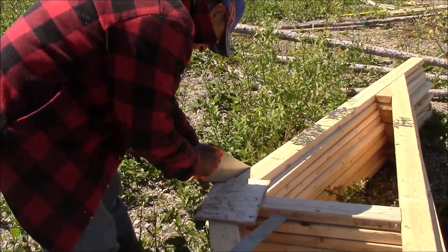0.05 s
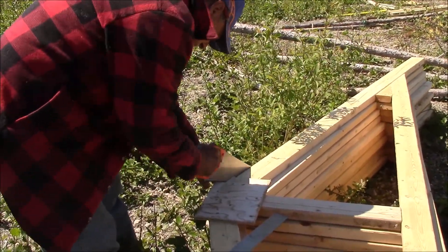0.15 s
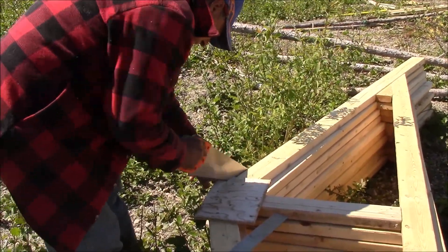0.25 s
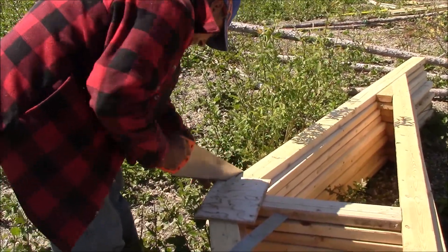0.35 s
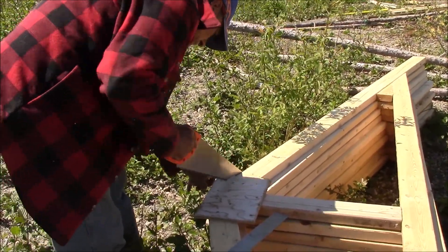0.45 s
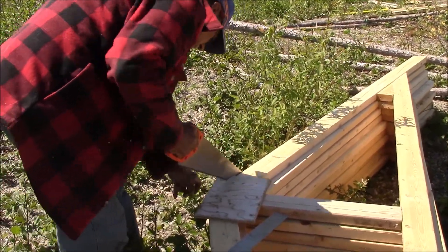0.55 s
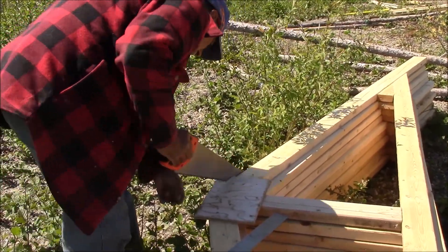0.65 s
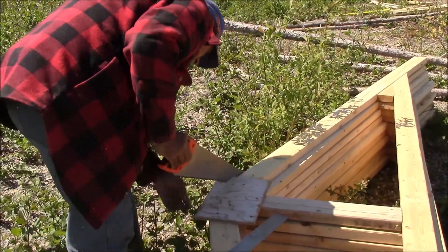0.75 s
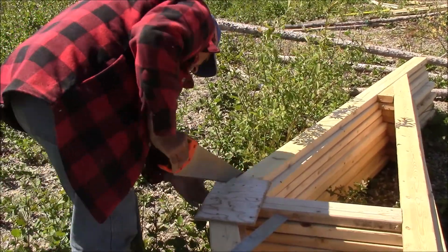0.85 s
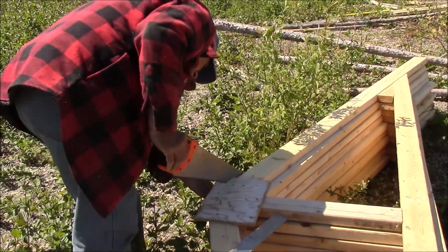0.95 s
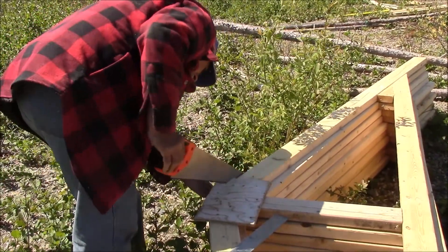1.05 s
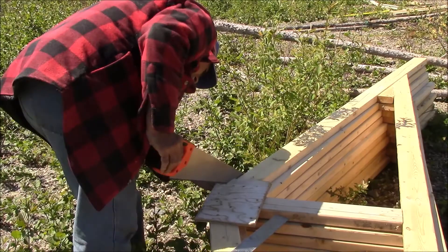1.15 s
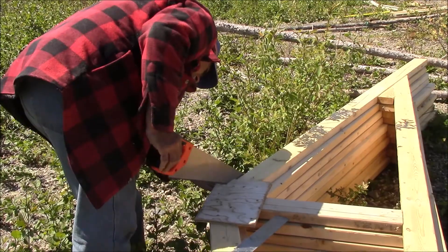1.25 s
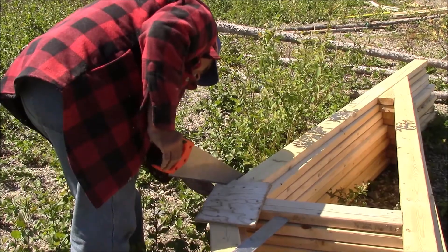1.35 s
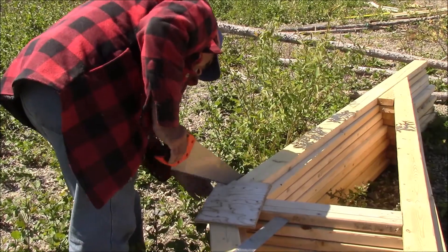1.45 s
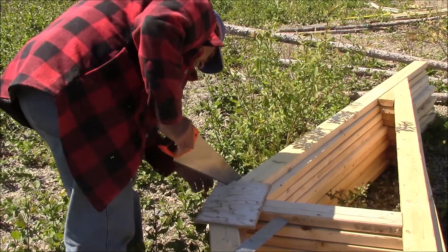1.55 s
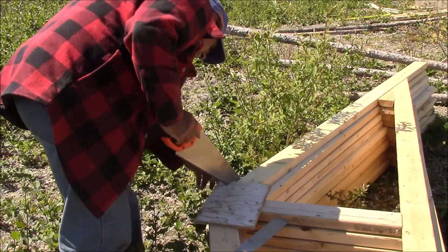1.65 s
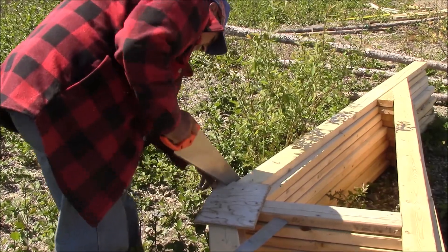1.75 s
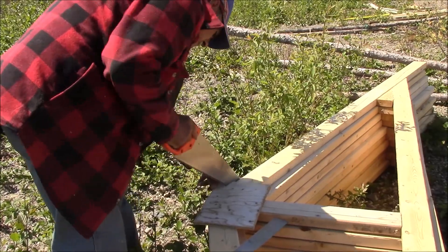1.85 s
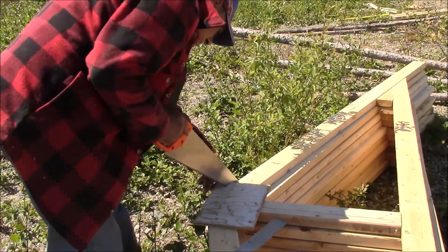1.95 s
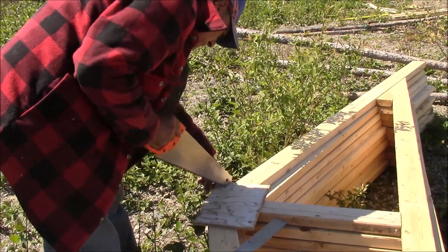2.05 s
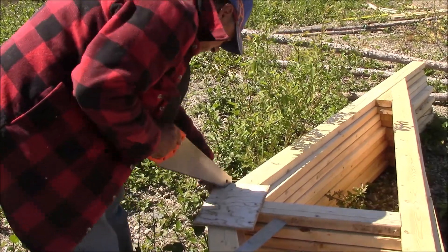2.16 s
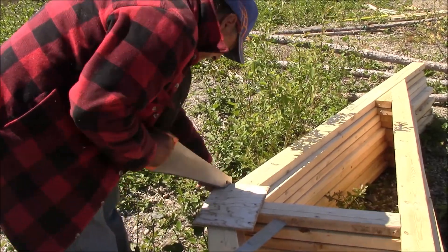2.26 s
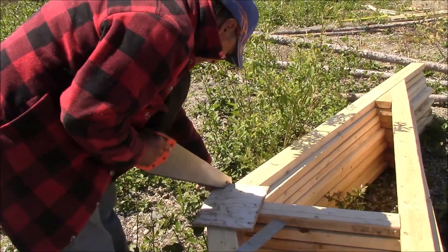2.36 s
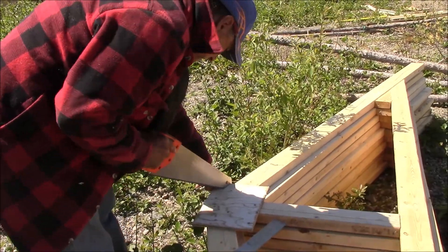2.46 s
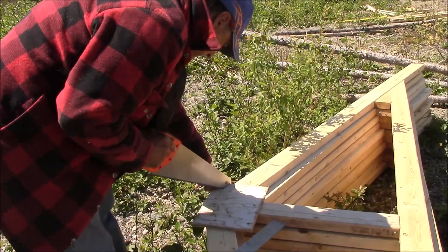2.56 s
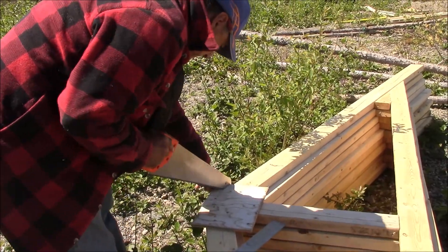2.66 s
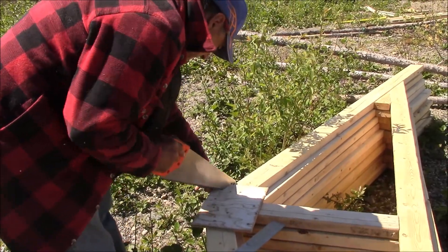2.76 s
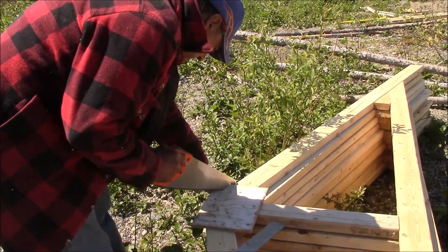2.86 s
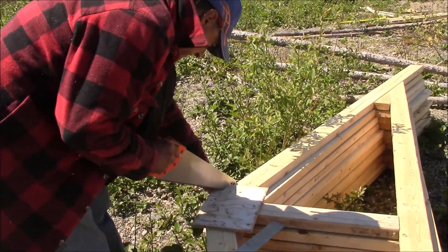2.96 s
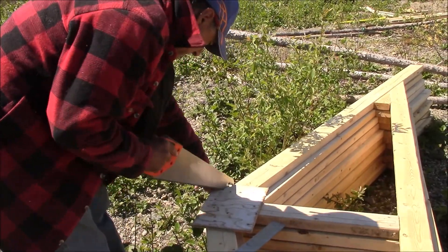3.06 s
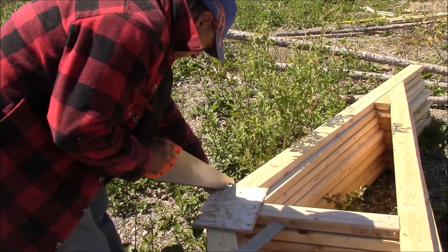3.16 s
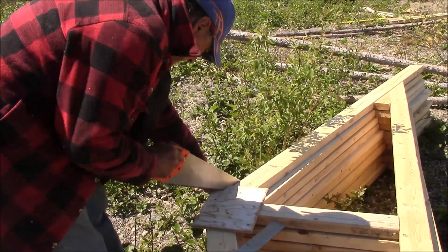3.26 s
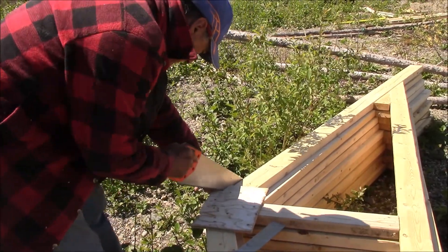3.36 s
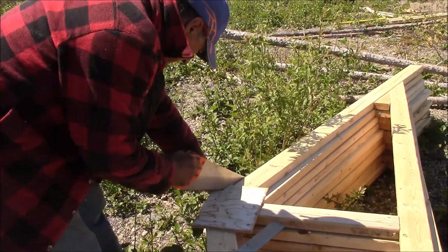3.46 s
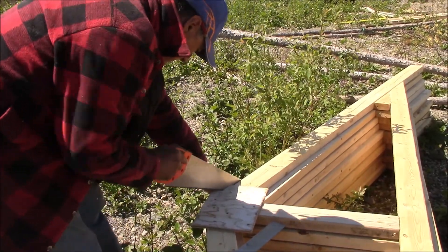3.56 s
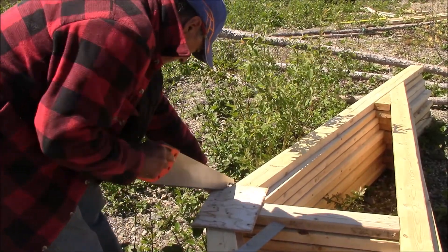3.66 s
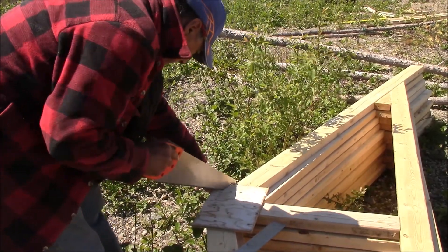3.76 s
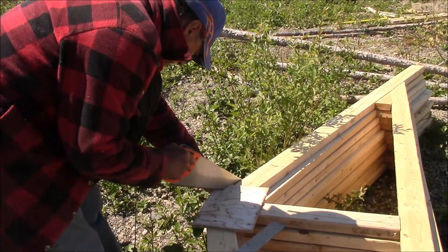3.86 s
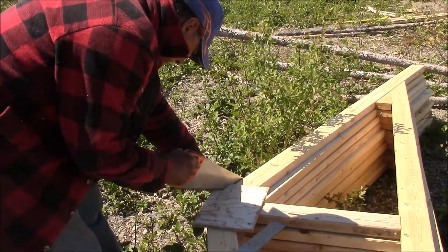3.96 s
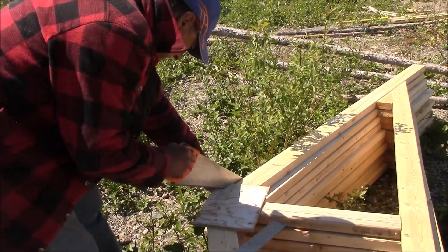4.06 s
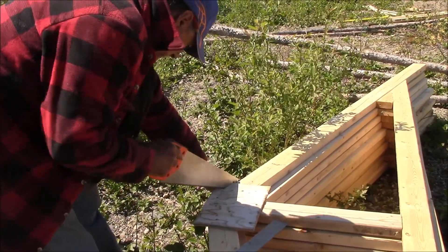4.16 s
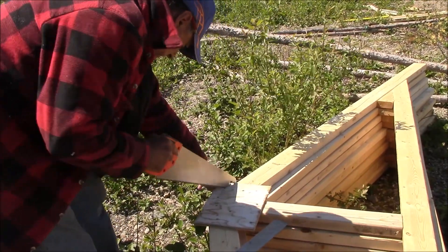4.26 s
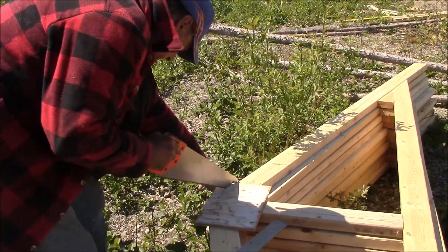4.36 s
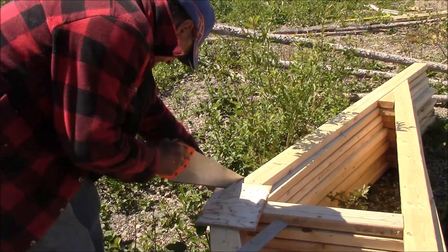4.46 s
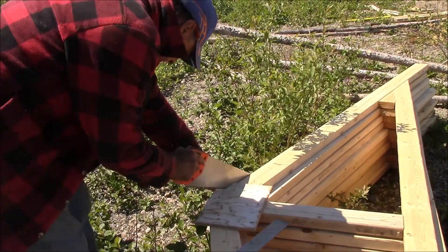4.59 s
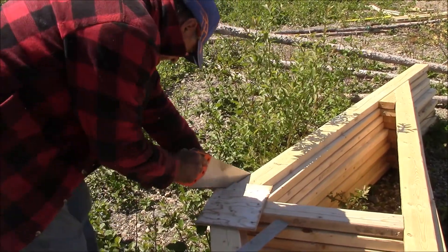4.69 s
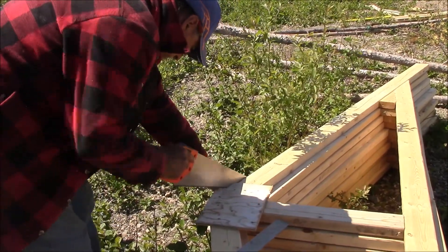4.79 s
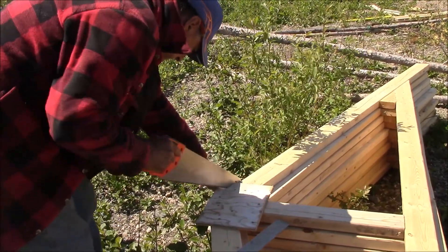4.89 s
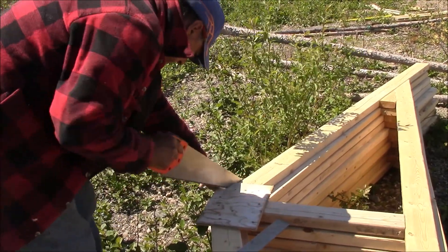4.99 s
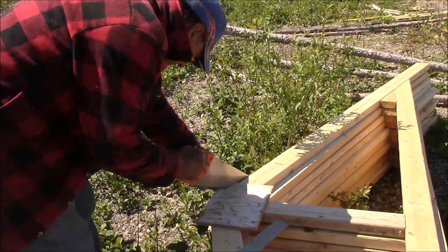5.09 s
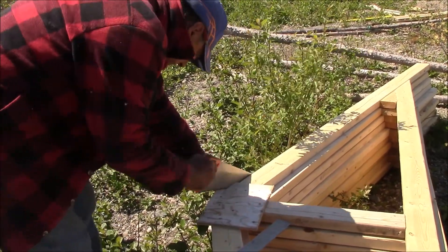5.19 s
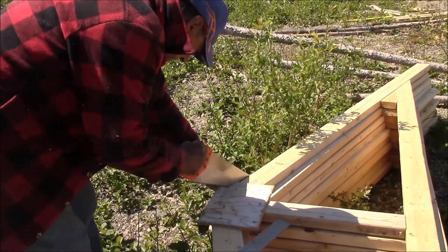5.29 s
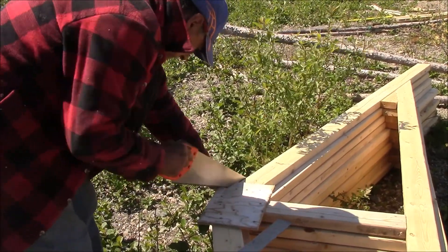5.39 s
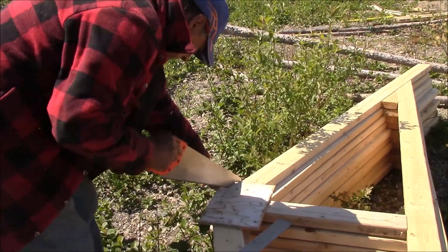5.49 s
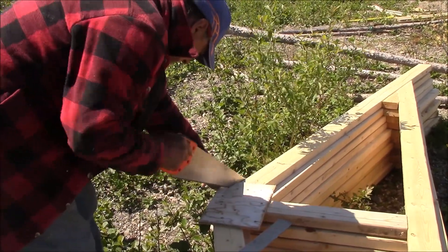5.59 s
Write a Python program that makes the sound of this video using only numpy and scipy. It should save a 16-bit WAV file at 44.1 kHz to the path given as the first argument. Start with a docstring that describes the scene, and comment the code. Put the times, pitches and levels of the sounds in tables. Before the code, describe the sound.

A hand saw cuts a plywood offcut on a timber frame outdoors. It opens mid-stroke with a brief squeal, falters into faint scrapes and ticks, drags longer, catches and cracks, then builds to strong regular rasps, louder strokes alternating with softer returns. Light breeze behind. Close microphone, dry, almost centred.

```python
"""Outdoors, on a timber frame: a hand saw works through a plywood offcut, heard close up, almost the same
on both sides. Teeth drum the board as pulses and grit through its modes, rasp the blade and throw hissing chips.
Caught teeth crack, single teeth squeak, and a binding blade sticks and slips: it creaks and squeals.
Behind the saw, shaped noise makes a light breeze in low puffs and a faint hiss of open air."""
import sys
import numpy as np
from scipy import signal
from scipy.fft import rfft, irfft, next_fast_len
from scipy.io import wavfile
from scipy.ndimage import uniform_filter1d, map_coordinates

SR = 44100
rng = np.random.default_rng(int(sys.argv[2]) if len(sys.argv) > 2 else 0)


def unload_wav(signal):
    """Save mono or channel-first audio to the path in sys.argv[1] as 16-bit WAV at rate SR, clipped to [-1, 1]."""
    wavfile.write(
        sys.argv[1],
        SR,
        np.round(np.clip(np.atleast_2d(signal).T, -1, 1) * 32767).astype(np.int16),
    )


N = 248283
TOP_HZ = 15780  # nothing sounds above this
JUDDER_DB, JUDDER_HZ = 1.1, 35  # the feed is never smooth: base depth, knots a second


def strokes():
    """Teeth cross the plies faster in loud strokes; each drums the board and gates the rasp and hiss."""
    judder = wobble(JUDDER_HZ)
    chip_gain, rasp_gain, board_gain = (
        gain * amp(JUDDER_DB * depth * judder) for gain, depth in zip(stroke_gains(), (.8, 1.1, .9)))
    teeth_hz = np.clip(280 * (board_gain / amp(-21.5)) ** .2, 70, 320)
    teeth = unit(pulses(teeth_hz, np.full(N, .4), scatter_db=5) / np.sqrt(teeth_hz))
    # each tooth tears for a few milliseconds
    gate = unit(through(teeth, np.exp(-np.arange(400) / (.0031 * SR))))
    board, rasp, chips = bodies()
    drum = through(board_gain * unit(.72 * teeth + grit(spiky_db=4.5)), board)
    tear = through(rasp_gain * unit((1 + .5 * gate) * grit(spiky_db=1.5)), rasp)
    spray = (1 + .28 * gate) * grit(spiky_db=1.7) + splinters()
    hiss = through(chip_gain * unit(spray), chips)
    return shifting(drum, depth_db=1.5) + shifting(tear, depth_db=3.3) + shifting(hiss, depth_db=1.6)


# Strokes of the arm: start_s, fastest_s, stop_s, chip_db, rasp_re_chip_db,
# board_re_chip_at_start_db, board_re_chip_at_stop_db, growth (power of gain with speed, no unit)
ARM_STROKES = [(-0.053, -0.04, 0.063, -35.5, -1.5, 7.0, 11.0, 3.5),
               (0.097, 0.221, 0.391, -34.0, 1.5, -7.0, 0.5, 1.3),
               (0.37, 0.381, 0.51, -45.0, -2.0, -13.0, 10.5, 4.4),
               (0.531, 0.546, 0.807, -55.0, 1.5, -1.0, -22.0, 0.7),
               (0.738, 1.064, 1.26, -43.0, -2.0, -14.0, -20.5, 0.9),
               (1.036, 1.136, 1.232, -53.0, -0.5, 6.5, 5.0, 3.8),
               (1.232, 1.231, 1.465, -48.5, -2.0, -29.0, -14.5, 0.4),
               (1.407, 1.604, 2.08, -36.5, -3.0, -23.5, -1.0, 0.5),
               (1.878, 1.923, 2.048, -42.0, 3.0, 0.0, 4.0, 0.6),
               (2.048, 2.123, 2.147, -39.0, -3.0, 2.0, 2.0, 1.0),
               (2.112, 2.169, 2.275, -38.5, -4.0, -10.0, 7.5, 4.5),
               (2.257, 2.317, 2.363, -48.5, 4.0, -2.0, -1.0, 4.4),
               (2.554, 2.568, 2.625, -56.5, 3.5, -15.0, -17.5, 0.4),
               (2.584, 2.714, 2.809, -35.0, -3.0, 1.0, 5.0, 3.8),
               (2.775, 2.807, 2.844, -54.0, -1.0, 0.5, 14.0, 2.4),
               (2.89, 2.968, 3.099, -44.0, -3.0, -5.0, 4.5, 1.9),
               (2.938, 2.962, 2.988, -44.0, 6.5, 0.5, 7.5, 1.2),
               (3.074, 3.262, 3.391, -27.5, -2.0, -4.5, 13.5, 2.8),
               (3.39, 3.564, 3.681, -36.0, 0.5, -4.0, 10.5, 1.7),
               (3.414, 3.456, 3.478, -35.0, -0.5, -1.0, 2.5, 1.6),
               (3.638, 3.804, 3.942, -27.0, -3.5, -5.0, 13.0, 4.0),
               (3.953, 4.109, 4.245, -39.5, -0.5, 7.0, 5.5, 2.1),
               (4.183, 4.368, 4.391, -37.0, -4.5, 4.0, -8.0, 2.0),
               (4.312, 4.47, 4.613, -28.5, -1.5, 6.5, 8.0, 3.6),
               (4.57, 4.612, 4.635, -51.5, 0.5, -1.0, -3.0, 0.6),
               (4.616, 4.806, 4.931, -41.5, 1.5, -2.0, 5.5, 1.1),
               (4.874, 5.053, 5.158, -23.0, -1.5, -6.5, 11.0, 4.8),
               (5.164, 5.395, 5.475, -45.0, 1.0, -1.0, 7.5, 0.8),
               (5.452, 5.704, 5.715, -21.0, -1.5, 2.5, 0.0, 3.8)]
# The blade only rubbing in the cut, under every stroke: chip_db, rasp_db, board_db
RUBBING_DB = (-63, -63, -69)
RASP_FOLLOWS = .36  # share of the board's lead that the rasp follows


def stroke_gains():
    """Chip, rasp and board gains: speed swells and fades in arcs, the teeth's bite shifts along the stroke."""
    t = np.arange(N) / SR
    power = np.zeros((3, N)) + amp(RUBBING_DB)[:, None] ** 2
    for start, fastest, stop, chip_db, rasp_db, first_db, last_db, growth in ARM_STROKES:
        turn_points = [start, max(fastest, start + 1e-3), stop]
        speed = np.sin(np.pi / 2 * np.interp(t, turn_points, [0, 1, 0]))
        bite_db = np.interp(t, [start, stop], [first_db, last_db])
        levels_db = chip_db + np.array([0 * t, rasp_db + RASP_FOLLOWS * bite_db, bite_db])
        power += (speed ** growth * amp(levels_db)) ** 2
    return np.sqrt(power)


# Plywood modes: pitch_hz, width_hz, level_db
BOARD_MODES = [(278, 32, -4.5), (560, 33.5, -3), (648, 36.6, 1), (776, 67, -1.5), (855, 30.3, 4),
               (916, 32, -3.5), (1072, 33, -3.5), (1152, 33, -12)]
# The board's many weak modes, as one spectrum: pitch_hz, level_db
BOARD_BOOM = [(120, -40), (240, -21), (420, -11.5), (560, -0.5), (900, 1.5), (1300, -3), (2500, -21)]
# Steel blade modes: pitch_hz, width_hz, level_db
BLADE_MODES = [(1617, 24, -3), (1706, 15, 5), (1890, 13.3, -9), (2109, 28, 9.5), (2414, 38, 2),
               (2620, 55, -3), (3227, 37, 2), (3784, 52, 2), (4100, 135, 3.5), (4780, 56, 3), (6437, 69, 2),
               (7970, 110, 5), (8560, 89, 2.5), (9540, 93, -4), (12150, 120, -13)]
# Spectrum of the rasp: pitch_hz, level_db (per Hz)
RASP_COLOUR = [(590, -23), (1000, -14), (1110, -3.5), (1290, -16.5), (1400, -7.5), (2110, -6), (3720, -10),
               (4110, -17), (5500, -17), (7150, -30), (12100, -120)]
# Spectrum of the flying chips: pitch_hz, level_db (per Hz)
CHIP_COLOUR = [(2240, -17), (3800, -11), (4100, -10.5), (5020, -3.5), (6110, -1.5), (6720, 0.5), (8270, 2),
               (9710, -2), (12700, -4.5), (15200, -15.5), (15700, -14)]


def bodies():
    """Responses of the board, the rasping blade and the chips, each at energy 1."""
    tilt = colour([(120, -24.5), (250, -3.5), (1200, -6), (2500, -27.5)])
    modes = signal.fftconvolve(ringing(BOARD_MODES), tilt)[:2 ** 12]
    board = modes / np.linalg.norm(modes) + .55 * colour(BOARD_BOOM)
    rasp = colour(RASP_COLOUR) + .35 * ringing(BLADE_MODES[:9])
    return board / np.linalg.norm(board), rasp / np.linalg.norm(rasp), colour(CHIP_COLOUR)


def grit(spiky_db):
    """Noise in bursts of a millisecond or so: fibres breaking."""
    bursts_db = spiky_db * wobble(900) + .6 * spiky_db * wobble(90)
    return unit(amp(bursts_db) * rng.standard_normal(N))


SPLINTERS_PER_S = 50
SPLINTER_DB, SPLINTER_SPREAD_DB = 11, 8  # smallest tick before its filter, range of sizes


def splinters():
    """Sparse bright ticks of uneven size: impulses through a short differenced noise burst."""
    draw = rng.random((N, 2))
    size = amp(SPLINTER_DB + SPLINTER_SPREAD_DB * draw[:, 1])
    ticks = (draw[:, 0] < SPLINTERS_PER_S / SR) * size
    burst = amp(-60 * np.arange(60) / (.0015 * SR)) * rng.standard_normal(60)
    return through(ticks, np.diff(burst) / 2)


def shifting(x, depth_db):
    """Random patches of pitch and time swell and fade, so the sound's colour keeps shifting."""
    grid = dict(nperseg=2 ** 10, noverlap=3 * 2 ** 8)
    spectrum = signal.stft(x, **grid)[2]
    drift = uniform_filter1d(rng.standard_normal(spectrum.shape), size=4, axis=0)
    drift = uniform_filter1d(drift, size=9, axis=1)
    gain = unit(amp(depth_db * unit(drift)))
    return signal.istft(spectrum * gain, **grid)[1][:N]


# Teeth that catch and let go: start_s, crack_peak_db, board_peak_re_crack_db, chip_peak_re_crack_db
CAUGHT_TEETH = [(0.5635, -30, -10, 7.5), (1.0048, -41, -13, 18), (1.4475, -50, -15, 21),
                (1.4655, -52, -15, 22), (2.0892, -18.5, -11.5, -12), (2.097, -18, -6, 0.5),
                (2.1252, -27, -0.5, -1), (2.1779, -18.5, -3, 6), (2.4004, -44, -16, 11),
                (2.4124, -45, -7, 8), (2.47, -55, -19, 19), (2.5032, -38.5, -17, -3),
                (2.8624, -38.5, -11, 2), (2.888, -14, -15, -26), (2.914, -26, -15, -15),
                (3.0286, -32, -30, 2), (4.0316, -19, -20, -20), (4.2631, -34.5, 0.5, -1),
                (4.3365, -22, 10.5, -8), (4.6513, -40, -18, -3), (5.0367, -14, 0, -5),
                (5.1674, -11, -25, -14), (5.5154, -45, -5, 17)]
# A crack in the wood at the cut: pitch_hz, level_db
CRACK_COLOUR = [(300, -30), (700, -10), (1700, 0), (3300, -6), (5000, -20), (9000, -34)]


def catches():
    """A freed tooth gives the board, the wood at the cut and the chips one short crack each."""
    out, t = np.zeros(N + SR), np.arange(200) / SR
    board, rasp, chips = bodies()
    crack = colour(CRACK_COLOUR) + .3 * rasp
    for s, db, board_db, chip_db in CAUGHT_TEETH:
        # response, peak level in dB, time for the burst to fall 60 dB in s
        parts = [(board, db + board_db, .002), (crack, db, .002), (chips, db + chip_db, .006)]
        for response, level_db, t60 in parts:
            burst = amp(-60 * t / t60) * rng.standard_normal(len(t))
            hit = signal.fftconvolve(burst, response)
            out[round(s * SR):][:len(hit)] += amp(level_db) * hit / np.abs(hit).max()
    return out[:N]


# Sticking and slipping: extra_wood_when_locked_db, unevenness (0-1), throb_depth (0-1),
# rows of [start_s, slips_hz, level_db]
STICK_SLIPS = [(-7, .13, .7, [(.0365, 2020, -55), (.041, 2020, -26), (.058, 2060, -22), (.078, 2090, -24),
               (.086, 2120, -60)]), (-4, .09, .1, [(3.377, 1750, -55), (3.380, 1800, -24),
               (3.383, 1900, -24), (3.385, 2400, -23), (3.396, 2750, -18), (3.399, 3200, -10),
               (3.407, 3200, -18), (3.414, 3180, -45)]), (0, .02, 0, [(3.9425, 90, -15), (3.965, 88, -16.5),
               (3.969, 22, -19), (3.992, 22, -40)]), (18, .33, .1, [(5.1465, 250, -17.5),
               (5.156, 300, -18.5), (5.168, 500, -22.5), (5.182, 2120, -30), (5.197, 2120, -29),
               (5.203, 2100, -55)])]
# A slip in the wood: pitch_hz, level_db
CREAK_COLOUR = [(200, -64), (500, -5.5), (800, -1.5), (1400, 6), (3000, -1), (5500, -4.5), (9000, -11.5),
                (15000, -28)]
# Wood gripping the blade: pitch_hz, width_hz, level_db
KNOT_MODES = [(770, 103, 0.5), (1330, 170, 0.5), (1585, 33, -2.5), (2710, 92, -5.5), (3830, 167, -11.5),
              (9040, 570, -8.5)]
# A slip in the steel: pitch_hz, level_db
SCREECH_COLOUR = [(700, -47.5), (1500, -9.5), (2200, 1.5), (3000, -9), (4100, 11), (5500, -6), (8300, -5),
                  (11000, -15.5), (15000, -28.5)]
LOCK_HZ, STEEL_FREE_DB, WOOD_LOCKED_DB = 1100, -16, -20  # faster slips pass from the wood to the steel
THROB_HZ = 128
TEAR_S = .0015  # decay of the fibres tearing after a slow slip


def binding():
    """Slow slips creak through the wood; fast ones pass to the steel, ring the blade modes and squeal."""
    slip_hz, level_db = curves(np.concatenate([bind[-1] for bind in STICK_SLIPS]))
    locked = 1 / (1 + (LOCK_HZ / slip_hz) ** 4)
    wood, steel, fibres = np.zeros(N), np.zeros(N), grit(spiky_db=3)
    for wood_db, uneven, throb, rows in STICK_SLIPS:
        stuck = slice(round(rows[0][0] * SR), round(rows[-1][0] * SR))
        hz, lock = slip_hz[stuck], locked[stuck]
        t = np.arange(len(hz)) / SR
        slips = pulses(hz, np.full(len(hz), uneven), scatter_db=.5) * np.sqrt(SR / hz)
        tail = np.exp(-np.arange(600) / (TEAR_S * SR))
        tearing = unit(signal.fftconvolve(np.abs(slips), tail)[:len(hz)])
        slips = slips + (.42 + .5 * (1 - lock) * tearing) * fibres[stuck]
        # two close blade modes beat
        slips *= amp(level_db[stuck]) * (1 + throb * np.cos(2 * np.pi * THROB_HZ * t))
        wood[stuck] = slips * amp((WOOD_LOCKED_DB + wood_db) * lock)
        steel[stuck] = slips * amp(STEEL_FREE_DB * (1 - lock))
    creak = .42 * colour(CREAK_COLOUR) + ringing(KNOT_MODES) + .33 * bodies()[0]
    squeal = .79 * colour(SCREECH_COLOUR) + ringing(BLADE_MODES)
    return through(wood, creak) + through(steel, squeal)


# Squeaks of single teeth: middle_s, pitch_hz, brightest_hz, level_db, half_length_s
TOOTH_SQUEAKS = [(2.322, 2100, 2100, -41, .02), (2.719, 6100, 11000, -26, .014),
                 (3.145, 3480, 9500, -32, .014), (3.160, 2900, 8500, -29, .016),
                 (3.179, 3000, 16000, -29.5, .018), (3.197, 3080, 12300, -34, .008),
                 (4.335, 3003, 3000, -31.5, .008), (4.36, 2930, 8800, -31, .015),
                 (5.376, 2100, 2100, -37.5, .025)]
OVERTONE_DB = -18  # per squared octave away from the brightest


def squeaks():
    """A tooth sings with overtones, rising a little and wavering; small chirps follow the rasp's level."""
    draw = rng.random((260, 4))
    when = .057 + draw[:, 0] * (N / SR - .1)
    small_hz = 1500 * 2.6 ** draw[:, 1]
    rasp_db = 20 * np.log10(stroke_gains()[1][(when * SR).astype(int)])
    small = np.c_[when, small_hz, small_hz, rasp_db - 6 + 8 * draw[:, 2], .006 + .012 * draw[:, 3]]
    out, order = np.zeros(N), np.arange(1, 6)[:, None]
    for s, hz, bright_hz, db, half_s in [*TOOTH_SQUEAKS, *small]:
        u = np.linspace(-1, 1, round(2 * half_s * SR))
        waver = uniform_filter1d(rng.standard_normal(len(u)), size=40) * np.sqrt(40)
        pitch = hz * (1 + .018 * u + .015 * waver)
        share = amp(OVERTONE_DB * np.log2(order * hz / bright_hz) ** 2) * (order * hz < TOP_HZ)
        tone = np.sum(share * np.sin(2 * np.pi * order * np.cumsum(pitch) / SR), axis=0)
        out[round((s - half_s) * SR):][:len(u)] += amp(db) * np.exp(-6 * u ** 2) * tone
    return out


def outdoors():
    """Breeze over the air's hiss."""
    return breeze() + air()


# Strength of the breeze: start_s, level_db
BREEZE_LEVEL = [(0, -52), (.09, -68), (.88, -66), (.96, -44), (1.18, -58), (1.33, -47), (1.57, -72),
                (2.0, -61), (2.5, -76), (3.25, -50), (3.63, -56), (3.73, -38), (3.8, -50), (4.01, -39),
                (4.23, -63), (4.38, -60), (4.45, -39), (4.58, -58), (4.72, -42), (4.78, -61), (5.08, -56),
                (5.2, -41), (5.36, -47), (5.53, -66), (5.63, -46)]
# Spectrum of a puff of wind: pitch_hz, level_db (per Hz)
PUFF_COLOUR = [(13, -82), (22, -37), (38, -14.5), (108, -4.5), (188, -2), (237, -16), (275, -7.5),
               (400, -20.5), (520, -19), (880, -120)]


def breeze():
    """Lumps of wind: low noise with an unsteady level."""
    lumps = amp(5 * wobble(24) + 1.5 * wobble(7))
    wind = lumps * through(rng.standard_normal(N), colour(PUFF_COLOUR))
    return amp(curves(BREEZE_LEVEL)[0]) * unit(wind)


# Spectrum of the open air: pitch_hz, level_db (per Hz)
AIR_COLOUR = [(59, -36), (100, -29), (294, 25.5), (865, 7), (1270, 10), (2190, 10), (4140, -3),
              (8320, -29.5), (15700, -40)]
AIR_DB = -68


def air():
    """A faint open-air hiss: steady shaped noise."""
    return amp(AIR_DB) * through(rng.standard_normal(N), colour(AIR_COLOUR))


def amp(db):
    """Gain of a level in dB."""
    return 10 ** (np.asarray(db) / 20)


def unit(x):
    """x at rms 1."""
    return x / np.sqrt(np.mean(x ** 2) + 1e-20)


def along(points, hz):
    """(Hz, value) points read on a log frequency axis."""
    f, v = np.transpose(points)
    return np.interp(np.log(hz + 1), np.log(f + 1), v)


def curves(rows):
    """One value per sample for each column after the time."""
    s, *cols = np.transpose(rows)
    return [np.interp(np.arange(N) / SR, s, c) for c in cols]


def wobble(rate):
    """A smooth random curve, rate knots a second."""
    knots = rng.standard_normal(int(N * rate / SR) + 4)
    return map_coordinates(knots, [np.arange(N) * rate / SR])


def colour(points):
    """Causal minimum-phase impulse response, energy 1, of a (Hz, dB) spectrum."""
    size = 2 ** 12
    gain = amp(along(points, np.fft.rfftfreq(size, 1 / SR)))
    cepstrum = irfft(np.log(gain + 1e-6), size)
    # fold the cepstrum forward in time
    cepstrum[1:size // 2] *= 2
    cepstrum[size // 2 + 1:] = 0
    h = irfft(np.exp(rfft(cepstrum)), size)
    return h / np.linalg.norm(h)


def ringing(modes):
    """Impulse response, energy 1, of decaying sines; wider modes die sooner."""
    t, h = np.arange(2 ** 12) / SR, 0
    for k, (hz, width, db) in enumerate(modes):
        decay = np.exp(-np.pi * width * t)
        h = h + (-1) ** k * amp(db) * width * decay * np.sin(2 * np.pi * hz * t)
    return h / np.linalg.norm(h)


def through(x, h):
    """x heard through the response h."""
    return signal.fftconvolve(x, h)[:N]


def pulses(rate_hz, uneven, scatter_db):
    """One pulse per turn of a phase, jittered in time and level, set between samples."""
    n, turns = len(rate_hz), np.cumsum(rate_hz) / SR
    draw = rng.standard_normal((int(turns[-1]) + 1, 2))
    at = np.interp(np.arange(len(draw)), turns, np.arange(n))
    k = at.astype(int)
    at = np.clip(at + uneven[k] * draw[:, 0] * SR / rate_hz[k] / 2, 8, n - 9)
    # windowed sinc around each pulse
    taps = at.astype(int)[:, None] + np.arange(-7, 9)
    offset = taps - at[:, None]
    shape = np.sinc(offset) * np.cos(np.pi * offset / 16) ** 2
    return np.bincount(taps.ravel(), (shape * amp(scatter_db * draw[:, 1:])).ravel(), n)


# Filter of the faint side layer: pitch_hz, level_db
SIDE_FILTER = [(60, -28), (200, -30), (700, -44), (1500, -29), (5000, -26), (15000, -22)]


def scene():
    """Middle sound on both sides, plus a faint side layer: filtered noise-smeared cracks, creaks and
    squeaks, and low noise."""
    sharp = catches() + binding() + squeaks()
    mid = strokes() + sharp + outdoors()
    smear = amp(-60 * np.arange(2 ** 11) / SR / .02) * rng.standard_normal(2 ** 11)
    smeared = through(sharp, smear / np.linalg.norm(smear))
    size = next_fast_len(N + SR // 4)
    side_gain = amp(along(SIDE_FILTER, np.fft.rfftfreq(size, 1 / SR)))
    side = irfft(rfft(smeared, size) * side_gain, size)[:N]
    side += amp(-11.5) * air() + amp(-28) * breeze()
    return np.array([mid + side, mid - side])


def record(dry):
    """Peaks round off at full scale; the bass is cut, and nothing is kept above the band limit."""
    soft = dry / (1 + np.abs(dry) ** 6) ** (1 / 6)
    size = next_fast_len(N + SR // 4)
    hz = np.fft.rfftfreq(size, 1 / SR)
    low_cut = (1j * hz / (70 + 1j * hz)) ** 2
    return irfft(rfft(soft, size) * low_cut * (hz < TOP_HZ), size)[:, :N]


dry = scene()
out = record(dry)
unload_wav(out)
```